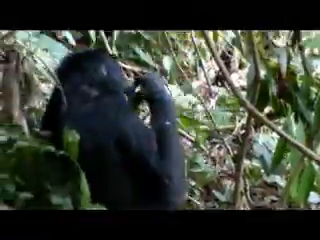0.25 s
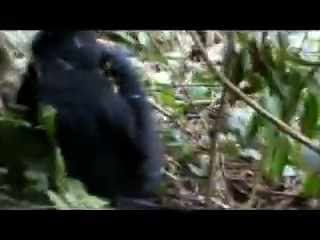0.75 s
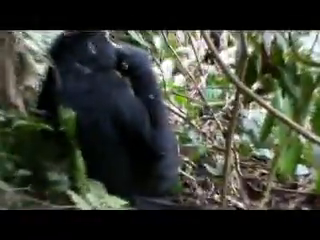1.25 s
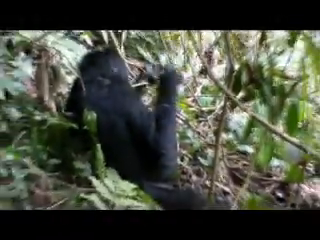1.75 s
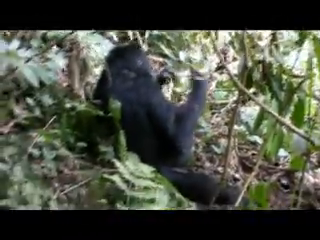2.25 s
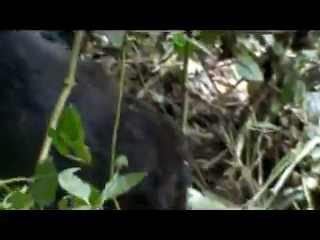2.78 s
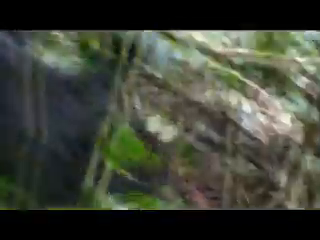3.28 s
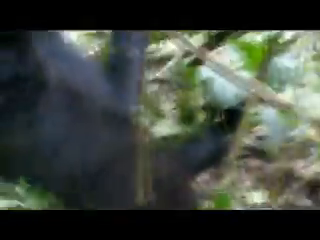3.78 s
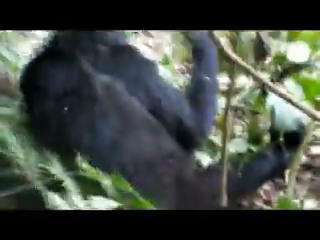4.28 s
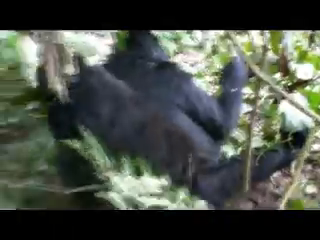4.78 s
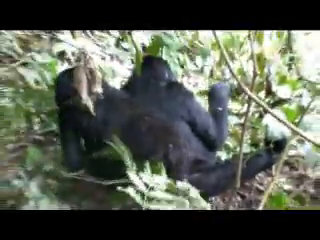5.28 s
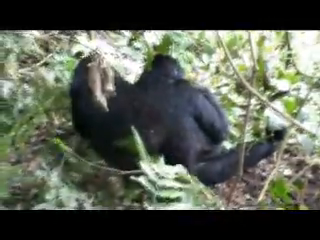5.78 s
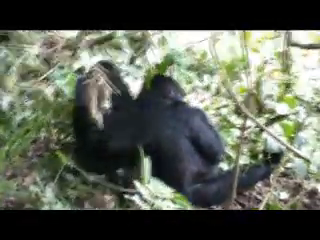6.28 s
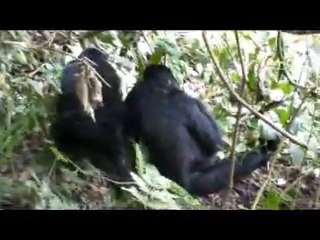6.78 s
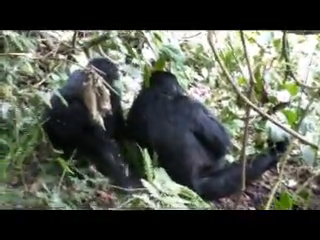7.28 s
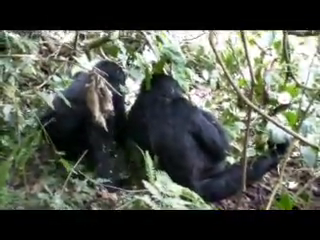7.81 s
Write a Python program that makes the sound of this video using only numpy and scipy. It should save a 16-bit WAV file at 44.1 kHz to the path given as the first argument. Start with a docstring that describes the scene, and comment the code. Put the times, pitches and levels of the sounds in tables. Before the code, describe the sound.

Crisp twig snaps and bright leaf rustling come in uneven bursts as gorillas handle forest plants, against a thin insect whine and distant air.

```python
"""A stem snaps with a soft thud over steady, shrill insects: two gorillas in dense undergrowth, a few metres off.
One strips and snaps stems, the other walks through the plants. Breaks are dying bursts of noise, rings damped sines.
Leaves and litter are random contacts, hiss and ringing leaf modes; heavy steps press the litter in swells of noise.
Distant air is shaped noise and the insects narrow, wavering noise bands; two of the soft thuds are camera bumps.
The level dips briefly near 2.55 s; from that moment the insect bands have a different balance."""
import sys
import numpy as np
from scipy import signal
from scipy.io import wavfile

SR = 44100
rng = np.random.default_rng(int(sys.argv[2]) if len(sys.argv) > 2 else 0)


def output_pcm(signal):
    """Save a mono or channel-first signal as 16-bit PCM at the path in sys.argv[1].

    Samples are clipped to [-1, 1] before scaling.
    """
    pcm = np.clip(np.atleast_2d(signal).T, -1, 1) * 32767
    wavfile.write(sys.argv[1], SR, np.round(pcm).astype(np.int16))


N = 355005   # samples, about 8.05 s


def from_db(db):
    """Decibels to gain."""
    return 10 ** (np.asarray(db) / 20)


def rms_one(x):
    """Scale to unit power."""
    return x / np.sqrt(np.mean(x ** 2) + 1e-20)


def in_time(rows):
    """Draw the second column of a breakpoint curve at every sample."""
    times_s, values = np.transpose(rows)
    return np.interp(np.arange(N) / SR, times_s, values)


def drift(rate_hz):
    """Smooth random wandering with spread 1: noise through a double pole, computed every 40 samples."""
    pole = np.exp(-2 * np.pi * rate_hz * 40 / SR)
    noise = rng.standard_normal(N // 40 + 2002)
    slow = signal.lfilter([1], [1, -2 * pole, pole ** 2], noise)[2000:]   # skip the filter's start
    return np.interp(np.arange(N) / 40, np.arange(len(slow)), rms_one(slow))


def band(x, low_hz, high_hz, order=2):
    """Causal Butterworth band-pass."""
    edges = [low_hz, min(high_hz, .48 * SR)]
    return signal.sosfilt(signal.butter(order, edges, "band", fs=SR, output="sos"), x)


def white():
    """Plain noise."""
    return rng.standard_normal(N)


def coloured(excite, spectrum):
    """Weight roughly third-octave bands, each with its own excitation, by a spectrum; rms 1."""
    hz, db = np.transpose(spectrum)
    edges = np.geomspace(hz[0], hz[-1], int(3 * np.log2(hz[-1] / hz[0])) + 2)
    log_centres = np.log(edges[:-1] * edges[1:]) / 2
    gains = from_db(np.interp(log_centres, np.log(hz), db))
    return rms_one(sum(g * band(excite(), low, high) for g, low, high in zip(gains, edges, edges[1:])))


def add(out, start_s, sound, level_db):
    """Place a short sound with the energy that level_db has over 10 ms."""
    at = int(start_s * SR)
    sound = sound * from_db(level_db) * np.sqrt(.01 * SR / np.sum(sound ** 2))
    out[at:at + len(sound)] += sound[:N - at]


FIRST_BREAK, FIRST_BREAK_T60_S = 1.8, 0.0029   # height of the first crack against the fibres, and its decay


def burst(length, t60_s, ragged_db):
    """A needle-sharp first break, then fibres giving way: a dense, uneven run of clicks that dies away."""
    t = np.arange(length) / SR
    fibres = from_db(ragged_db * rng.standard_normal(length) - 60 * t / max(t60_s, .002))
    first = FIRST_BREAK * from_db(-60 * t / FIRST_BREAK_T60_S)
    return rng.standard_normal(length) * (first + fibres)


# Stems and twigs snapping; all break, ring and thud levels are energies over 10 ms before scatter and final colour.
# Columns: start_s, t60_s (of the crack), knock_db, crack_db, tick_db
STEM_SNAPS = [(.067, 0.023, -61, -49, -63), (0.6968, .014, -51, -46.5, -61),
              (.856, 0.025, -60.5, -51.5, -67), (.974, .02, -58.5, -56.5, -67.5),
              (1.513, .07, -75, -59, -42.5), (1.5945, .006, -80, -69, -47), (1.6882, .005, -63, -60, -43),
              (1.691, .06, -75, -60, -46), (1.769, .018, -58, -52, -64), (1.818, .018, -66, -54, -64),
              (1.855, .015, -63.5, -54, -64), (1.872, .015, -68, -58, -64), (1.9714, 0.015, -66, -49, -66),
              (2.1266, .012, -48, -42, -41), (2.3577, .006, -56.5, -45, -36),
              (2.3667, 0.043, -62, -52, -42), (2.3727, .02, -63, -43, -39),
              (2.378, 0.0083, -58, -48, -31.5), (2.3824, 0.032, -65, -49, -33),
              (2.571, 0.018, -57, -55, -57), (2.604, 0.048, -62, -46, -48), (2.621, 0.044, -50, -41, -46),
              (2.6349, 0.045, -65, -50, -50), (2.6632, .025, -62, -46, -45), (2.672, 0.075, -72, -52, -39),
              (2.6855, 0.078, -67, -57, -38.5), (2.7981, 0.023, -50, -48, -64.5),
              (2.909, .02, -56, -59, -47), (3.0182, .005, -68, -49, -49), (3.1055, .004, -70, -49.5, -55),
              (3.218, .018, -56, -49, -43), (3.2772, 0.0078, -53.5, -50, -50),
              (3.361, 0.01, -63, -54, -39.5), (3.3981, .012, -66, -51, -45.5),
              (3.4098, .014, -63, -52, -59), (4.0324, .007, -58, -40.5, -43),
              (4.036, 0.033, -59, -43.5, -36.5), (4.0894, .025, -61, -57, -47),
              (4.0998, .014, -64, -56, -44), (4.561, .004, -70.5, -64, -47.5),
              (5.1049, .014, -54, -52.5, -47.5), (5.182, 0.033, -53, -52, -60),
              (5.2355, .02, -59, -50, -47), (5.2425, 0.035, -61, -44, -42), (5.258, 0.1, -62, -41, -41.5),
              (5.384, .02, -70, -50, -50), (5.455, .018, -66, -56, -45), (5.467, .012, -56, -52, -45),
              (5.4746, .015, -55, -51, -47), (5.567, .015, -70, -55, -45), (5.596, .012, -68, -52.5, -58),
              (5.8322, 0.025, -57, -44.5, -48), (5.847, .014, -64, -56, -50.5),
              (6.331, .005, -64, -62, -44.5), (6.8883, 0.041, -71, -64, -45),
              (7.0304, 0.0055, -70, -63, -52), (7.0364, 0.011, -54, -55, -40), (7.3578, .19, -67, -48, -38),
              (7.3709, .04, -63, -38.5, -39), (7.3736, .03, -60, -44, -39), (7.3754, 0.1, -55, -40, -33),
              (7.5, 0.054, -76, -57, -37), (7.5663, .015, -75.5, -59, -42.5),
              (7.8486, 0.025, -55, -52.5, -53)]
# The bands of knock, crack and tick: low_hz, high_hz
SNAP_RANGES = [(950, 2340), (2500, 7700), (6500, 13600)]


def snaps():
    """Thick stems knock and crack, thin ones tick; the low part rings a little longer."""
    out = np.zeros(N)
    for start_s, t60_s, *levels in STEM_SNAPS:
        for (low, high), level_db, linger in zip(SNAP_RANGES, levels, (1.2, 1.0, .8)):
            fracture = burst(SR // 8, t60_s * linger, ragged_db=4.0)
            add(out, start_s, band(fracture, low, high, order=3), level_db)
    return out


# One tough stem creaks in jerks as it tears: start_s, level_db, pitch_hz
STEM_CREAKS = [(2.6212, -42, 2280), (2.635, -48, 2280), (2.663, -45.5, 2300), (2.684, -47, 2400)]
# The stem's modes: pitch_multiple (ratio), relative_level_db, t60_s
STEM_MODES = [(1, 0, .011), (1.48, -4.5, 0.0077), (2.45, 0.5, 0.0044)]
CREAK_SLIP_T60_S = 0.02   # each jerk is a dying run of slips
CREAK_LOW_HZ, CREAK_HIGH_HZ = 2040, 7000   # the slips drive the thin stem only in this band


def creaks():
    """Every jerk of the tearing stem drives the same set of damped modes with a rough run of slips."""
    out, t = np.zeros(N), np.arange(SR // 8) / SR
    for start_s, level_db, pitch_hz in STEM_CREAKS:
        slips = burst(len(t), CREAK_SLIP_T60_S, ragged_db=5.5)
        slips = band(slips, CREAK_LOW_HZ, CREAK_HIGH_HZ, order=4)
        for multiple, mode_db, t60_s in STEM_MODES:
            mode = np.cos(2 * np.pi * multiple * pitch_hz * t) * from_db(-60 * t / t60_s)
            add(out, start_s, signal.fftconvolve(slips, mode), level_db + mode_db)
    return out


# Short rings and hums of stems that bend, break or knock together: start_s, pitch_hz, level_db, t60_s
STEM_RINGS = [(.08, 362, -58, 0.17), (1.6882, 9800, -40.5, 0.0043), (1.69, 3240, -54, .05),
              (2.005, 502, -59, 0.16), (2.1272, 2950, -39, 0.014), (2.1261, 4000, -35.5, 0.012),
              (2.128, 4520, -36.5, 0.012), (2.358, 1310, -55, .05), (2.378, 3610, -45.5, 0.018),
              (2.571, 736, -51, 0.049), (2.622, 803, -56, 0.036), (3.277, 2000, -49.5, 0.011),
              (3.342, 1140, -54, 0.061), (5.833, 736, -56.5, 0.024), (6.328, 230, -64, .03),
              (6.33, 702, -59, .035), (6.342, 450, -60, .07), (6.328, 1121, -54, 0.0079),
              (7.259, 2410, -54, 0.03), (7.375, 1745, -50, 0.03), (7.3719, 4890, -37.5, .012)]


def rings():
    """Damped modes of green wood, each a dying sine from a random phase."""
    out, t = np.zeros(N), np.arange(SR // 6) / SR
    for start_s, pitch_hz, level_db, t60_s in STEM_RINGS:
        tone = np.sin(2 * np.pi * (pitch_hz * t + rng.random()))
        add(out, start_s, tone * from_db(-60 * t / t60_s), level_db)
    return out


TWIGS_PER_S, TWIG_T60_S = 10.0, .009   # small twigs that give way by chance
TWIG_DB, TWIG_SPREAD_DB = -6.5, 5.5   # mean level against the litter's curve, and its scatter
TWIG_LOW_HZ, TWIG_HIGH_HZ = 1800, 5950   # range of the lower edge of a twig's octave


def twigs(litter_db):
    """Small twigs snap at random, each in an octave of its own, louder while the litter is being crushed."""
    out = np.zeros(N)
    for at in np.flatnonzero(rng.random(N) < TWIGS_PER_S / SR):
        low_hz = TWIG_LOW_HZ * (TWIG_HIGH_HZ / TWIG_LOW_HZ) ** rng.random()
        crack = band(burst(SR // 16, TWIG_T60_S, ragged_db=8.0), low_hz, 2 * low_hz)
        level_db = litter_db[at] + TWIG_DB + TWIG_SPREAD_DB * rng.standard_normal()
        add(out, at / SR, crack, level_db)
    return out


STALKS_PER_S, STALK_T60_S = 12, 0.0037   # leaf stalks that tick by chance among the green leaves
STALK_DB, STALK_SPREAD_DB = -8.5, 4   # mean level against the leaves' curve, and its scatter
STALK_LOW_HZ, STALK_HIGH_HZ = 5470, 13000   # the band of such a tick


def stalks(leaf_db):
    """Thin leaf stalks give needle-sharp ticks at random, louder while the leaves are being pushed."""
    out = np.zeros(N)
    for at in np.flatnonzero(rng.random(N) < STALKS_PER_S / SR):
        tick = band(burst(SR // 32, STALK_T60_S, ragged_db=9.0), STALK_LOW_HZ, STALK_HIGH_HZ)
        level_db = leaf_db[at] + STALK_DB + STALK_SPREAD_DB * rng.standard_normal()
        add(out, at / SR, tick, level_db)
    return out


# Soft thuds: weight on soft ground, stems letting go; near 3.64 and 3.73 s the camera is bumped.
# Columns: start_s, level_db, t60_s (of the puff)
SOFT_THUDS = [(0.074, -62, 0.11), (0.697, -62, 0.048), (2.126, -54.5, 0.056), (2.572, -61, 0.07),
              (2.622, -58, 0.15), (2.817, -62, 0.19), (3.277, -64, 0.044), (3.635, -65, .044),
              (3.731, -67, .066), (5.105, -63, .06), (5.182, -67, 0.061), (5.235, -59, 0.072),
              (5.832, -62.5, 0.082), (6.327, -67, .05), (7.372, -64, .08), (7.85, -66, 0.042)]
# Spectrum of the puff of noise: frequency_hz, relative_level_db (per Hz)
PUFF_COLOUR = [(110, -4), (200, 10), (400, 4), (750, 1), (1400, -31)]


def thuds(push_hz, push_t60_s, puff_db):
    """A soft blow: one dull, damped low sine and a short, dying puff of noise."""
    out, noise = np.zeros(N), coloured(white, PUFF_COLOUR)
    t = np.arange(SR // 4) / SR
    push = rms_one(np.sin(2 * np.pi * push_hz * t) * from_db(-60 * t / push_t60_s))
    for start_s, level_db, t60_s in SOFT_THUDS:
        cut = rng.integers(N - len(t))   # a random piece of the noise each time
        puff = rms_one(noise[cut:cut + len(t)] * from_db(-60 * t / t60_s))
        add(out, start_s, band(push + from_db(puff_db) * puff, 45, 3000), level_db)
    return out


def undergrowth(x, t60_s, wet_db):
    """Stems and leaves scatter a short, diffuse tail that starts after 2 ms."""
    t = np.arange(SR // 3) / SR
    tail = rng.standard_normal(len(t)) * from_db(-60 * t / t60_s) * (t > .002)
    tail = tail / np.sqrt(np.sum(tail ** 2))
    return x + from_db(wet_db) * signal.fftconvolve(x, tail)[:N]


def swells(rows, rise_s, settle_s):
    """Power over time of movements (start_s, length_s, level_db) that rise smoothly, hold and die away."""
    t, power = np.arange(N) / SR, 1e-8
    for start_s, length_s, level_db in rows:
        rise = .5 + .5 * np.tanh((t - start_s) / (2 * rise_s))
        settle = np.exp(-np.clip((t - start_s - length_s) / settle_s, 0, 20))
        power = power + (from_db(level_db) * rise * settle) ** 2
    return power


# An arm or body pushes through the plants: green leaves brush, dry litter is crushed.
# Columns: start_s, length_s, leaf_db, litter_db (both before the layer trims)
PLANT_PUSHES = [(0.239, .026, -53, -64), (0.411, 0.061, -48.5, -64), (.655, 0.062, -56.5, -60),
                (.85, 0.13, -51, -57), (1.027, .27, -52.5, -59), (1.464, .11, -48.5, -64),
                (2.079, 0.033, -50, -54), (2.33, .14, -45, -53), (2.6, 0.059, -42.5, -52),
                (2.804, .09, -48, -49), (3.065, .08, -51.5, -54), (3.184, .06, -47.5, -51),
                (3.358, 0.061, -47.5, -52), (3.71, 0.052, -56.5, -58), (3.895, .026, -53.5, -55.5),
                (4.03, .1, -43, -51), (4.243, 0.076, -44.5, -56), (4.343, .1, -49, -60),
                (5.1, .024, -52, -59), (5.229, .06, -44, -52), (5.42, 0.089, -46.5, -55),
                (5.61, .126, -50, -59), (5.837, 0.088, -50, -58.5), (5.96, .07, -51, -58.5),
                (6.29, 0.056, -53, -59.5), (6.476, .14, -45.5, -59), (6.655, .24, -47.5, -57.5),
                (6.99, .026, -50.5, -50.5), (7.157, 0.061, -51.5, -61), (7.365, .11, -44, -56),
                (7.507, .08, -41, -56), (7.713, 0.087, -45.5, -56)]
PUSH_RISE_S, PUSH_SETTLE_S = .014, .051   # plants bend quickly and settle more slowly
# The plants never quite rest between pushes: time_s, leaf_db (before the layer trims)
PLANT_STIR = [(0.0, -55.0), (0.529, -57.5), (1.379, -51.0), (1.87, -51.5), (2.076, -59.5), (2.608, -49.0),
              (3.736, -53.5), (4.573, -51.5), (4.928, -54.0), (5.457, -48.0), (6.247, -52.5),
              (7.273, -51.0), (8.05, -54.5)]
STIR_LITTER_DB = -6.5   # the litter's part in that, against the leaves'


def movement():
    """Level curves in dB of the leaves and of the litter: pushes on top of a constant stirring."""
    stir_db = in_time(PLANT_STIR)
    leaf_rows = [(start_s, length_s, leaf_db) for start_s, length_s, leaf_db, _ in PLANT_PUSHES]
    litter_rows = [(start_s, length_s, litter_db) for start_s, length_s, _, litter_db in PLANT_PUSHES]
    leaf_power = swells(leaf_rows, PUSH_RISE_S, PUSH_SETTLE_S) + from_db(stir_db) ** 2
    litter_power = swells(litter_rows, PUSH_RISE_S, PUSH_SETTLE_S) + from_db(stir_db + STIR_LITTER_DB) ** 2
    return 10 * np.log10(leaf_power), 10 * np.log10(litter_power)


def grains(per_s, spread_db):
    """Tiny contacts at random moments, many weak and a few strong; rms 1."""
    at = np.flatnonzero(rng.random(N) < per_s / SR)
    strength = from_db(spread_db * np.minimum(rng.exponential(1, len(at)), 4))
    out = np.zeros(N)
    out[at] = strength * rng.choice([-1, 1], len(at))
    return rms_one(out) + 1e-18   # the offset keeps the filters out of denormals


def foliage(level_db, spectrum, per_s, spread_db, clump_db, flutter_db, hiss):
    """Clumped contacts, denser as the push grows, over sliding hiss; each band flutters on its own."""
    rate = per_s * from_db((level_db - np.median(level_db)) / 2)
    shared = grains(rate, spread_db)   # sharp contacts reach every band at once

    def excite():
        """Shared and separate contacts plus the hiss of sliding blades, with a flutter of their own."""
        contacts = shared + grains(rate, spread_db) + hiss * white()
        return contacts * from_db(flutter_db * drift(24.6))

    clumped = coloured(excite, spectrum) * from_db(clump_db * drift(30))
    return from_db(level_db) * rms_one(clumped)


MODE_SHARE = .15   # share of the leaf modes that one buckling sets ringing


def crinkle(level_db, low_hz, high_hz, per_s, spread_db, cycles, count):
    """Single leaves buckle; each buckling rings a few modes that fall 60 dB in the given cycles."""
    pops, out = grains(per_s, spread_db), 0
    at = np.flatnonzero(np.abs(pops) > 1e-9)
    for hz in np.geomspace(low_hz, high_hz, count):
        struck = np.full(N, 1e-18)
        chosen = rng.random(len(at)) < MODE_SHARE
        struck[at] = pops[at] * rng.standard_normal(len(at)) * chosen
        radius, angle = from_db(-60 * hz / (cycles * SR)), 2 * np.pi * hz / SR
        resonator = [1, -2 * radius * np.cos(angle), radius ** 2]
        out = out + np.sqrt(hz) * signal.lfilter([0, np.sin(angle)], resonator, struck)
    return from_db(level_db) * rms_one(out)


# Spectrum of brushing green leaves: frequency_hz, relative_level_db (per Hz)
GREEN_COLOUR = [(2000, -13), (4000, -8), (6000, -1), (8000, 0.5), (10000, 0), (13500, -1)]


def leaves(leaf_db):
    """Green blades brush and hiss, and buckling leaves ring brightly on top."""
    brush = foliage(leaf_db, GREEN_COLOUR, per_s=1400, spread_db=1.0, clump_db=1.3, flutter_db=1.06, hiss=1.2)
    ringing = crinkle(leaf_db - 11.5, 6500, 12900, per_s=400, spread_db=2.5, cycles=310, count=30)
    return from_db(-1.9) * brush + ringing


# Spectrum of crushed dry litter: frequency_hz, relative_level_db (per Hz)
DRY_COLOUR = [(300, -14.5), (680, -1.5), (950, -6.5), (1700, -4), (2500, -1.5), (3700, 1.5), (5500, -10.5),
              (9000, -8)]


def litter(litter_db):
    """Dry leaves crackle in sparser contacts, and their buckling rings lower."""
    crush = foliage(litter_db, DRY_COLOUR, per_s=400, spread_db=3.0, clump_db=0.85, flutter_db=1.85, hiss=0.66)
    ringing = crinkle(litter_db - 6.5, 2051, 4295, per_s=240, spread_db=2.5, cycles=180, count=24)
    return from_db(-3.0) * crush + ringing


# Weight shifts and grinds the litter: start_s, length_s, level_db (before the layer trim)
WEIGHT_TREADS = [(.842, 0.38, -60), (2.404, .12, -61), (2.815, 0.036, -45.5), (2.934, 0.38, -62.5),
                 (3.334, 0.092, -55.5), (4.037, 0.064, -59), (5.221, 0.038, -62.5), (7.348, 0.046, -57.5),
                 (7.448, 0.18, -67.5)]
TREAD_RISE_S, TREAD_SETTLE_S = .024, .048
# Spectrum of pressed litter: frequency_hz, relative_level_db (per Hz)
PRESSED_COLOUR = [(100, -10), (280, -18.5), (400, -9), (800, -11.5), (1500, -4), (2400, -4), (5000, -11)]


def treads():
    """Heavy steps press many litter contacts together into a dull, uneven grind."""
    tread_db = 10 * np.log10(swells(WEIGHT_TREADS, TREAD_RISE_S, TREAD_SETTLE_S))
    grind = foliage(tread_db, PRESSED_COLOUR, per_s=700, spread_db=4.0, clump_db=0.7, flutter_db=2.0, hiss=0.95)
    return from_db(-2.5) * grind


# Insect chorus, before and after BREAK_S: centre_hz, width_hz, before_db, after_db (before waver and final colour)
INSECT_BANDS = [(5056, 69, -63, -64), (5255, 53, -75, -60.5), (5357, 61, -59, -60.5),
                (5580, 54, -68.5, -61), (5560, 1300, -65, -62), (6516, 210, -60.5, -62),
                (6670, 1040, -60, -61)]
BREAK_S = 2.545   # moment at which the balance of the bands switches


def insects(waver_db):
    """Many far callers blur into noise bands, most of them narrow, that waver in level."""
    early, out = np.arange(N) / SR < BREAK_S, 0
    for hz, width_hz, before_db, after_db in INSECT_BANDS:
        chorus = rms_one(band(white(), hz - width_hz / 2, hz + width_hz / 2))
        level_db = np.where(early, before_db, after_db) + waver_db * drift(8.6)
        out = out + chorus * from_db(level_db)
    return out


# Spectrum of the distant air and leaves: frequency_hz, relative_level_db (per Hz)
AIR_COLOUR = [(25, -46), (50, -9), (85, -2.5), (200, -2), (275, -12), (360, 2), (430, 6), (540, -2),
              (700, -4), (950, -2.5), (2000, -1.5), (5000, -5.5), (13500, -12.5)]
# Their slow level: time_s, level_db (before the final colour)
AIR_LEVEL = [(0, -60.5), (2.5, -59.5), (2.6, -60.5), (4.8, -62), (5.5, -60.5), (8.05, -61.5)]


def forest():
    """Distant air and leaves merge into steady noise with a slowly moving level."""
    return from_db(in_time(AIR_LEVEL)) * coloured(white, AIR_COLOUR)


def scene():
    """The animals in the plants, with the forest behind them."""
    leaf_db, litter_db = movement()
    breaks = snaps() + creaks() + rings() + twigs(litter_db) + stalks(leaf_db)
    blows = thuds(push_hz=103, push_t60_s=0.023, puff_db=-3.5)
    near = undergrowth(breaks + blows, t60_s=0.066, wet_db=-8.0)
    plants = leaves(leaf_db) + litter(litter_db) + treads()
    background = insects(waver_db=1.97) + forest()
    return (near + plants + background)[None]


# The brief dip in level: time_s, gain_db
LEVEL_DIP = [(2.527, 2), (2.533, -16), (2.547, -25), (2.556, -13), (2.571, 1.5)]
# Peaks and notches of the overall colour: centre_hz, width_hz, gain_db
OVERALL_COLOUR = [(3550, 310, 2), (4735, 640, -3.5), (6210, 180, -5.5), (6510, 410, -3), (8620, 310, 3.5),
                  (10140, 710, 3.5), (11450, 710, -3)]
CUTOFF_HZ = 13480   # steep top cut


def record(dry):
    """Dip the level briefly, then colour with narrow peaks and notches and a steep top cut."""
    x = dry * from_db(in_time(LEVEL_DIP))
    for hz, width_hz, gain_db in OVERALL_COLOUR:
        angle, gain = 2 * np.pi * hz / SR, from_db(gain_db / 2)
        alpha, cosine = np.sin(angle) * width_hz / hz / 2, np.cos(angle)
        numerator = [1 + alpha * gain, -2 * cosine, 1 - alpha * gain]
        denominator = [1 + alpha / gain, -2 * cosine, 1 - alpha / gain]
        x = signal.lfilter(numerator, denominator, x)
    return signal.sosfilt(signal.ellip(12, .2, 75, CUTOFF_HZ, fs=SR, output="sos"), x)


dry = scene()
out = record(dry)
output_pcm(out)
```